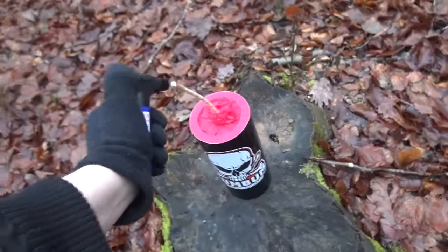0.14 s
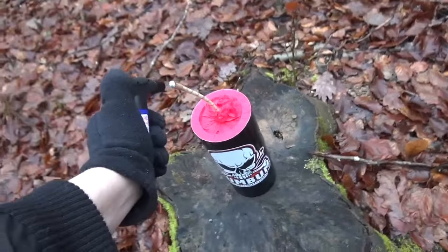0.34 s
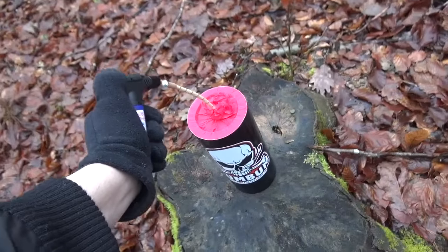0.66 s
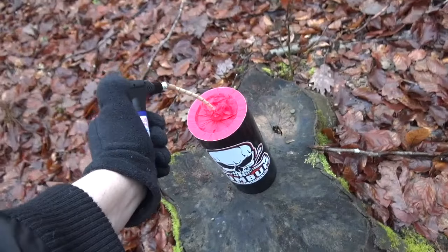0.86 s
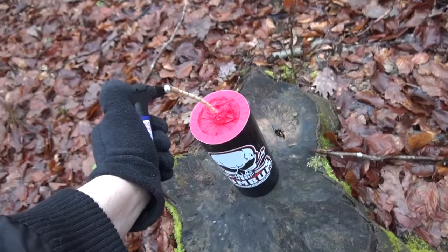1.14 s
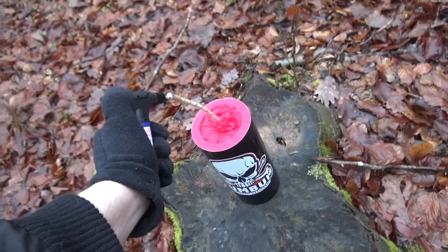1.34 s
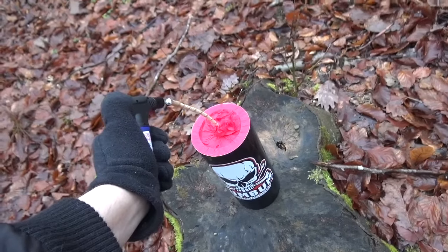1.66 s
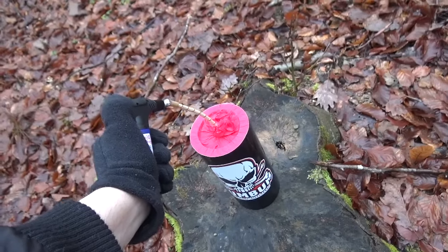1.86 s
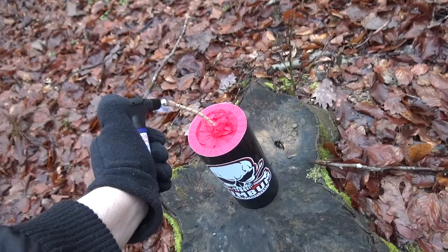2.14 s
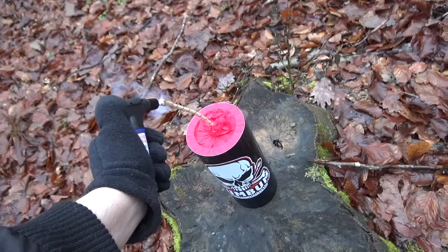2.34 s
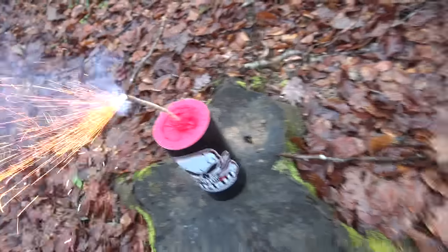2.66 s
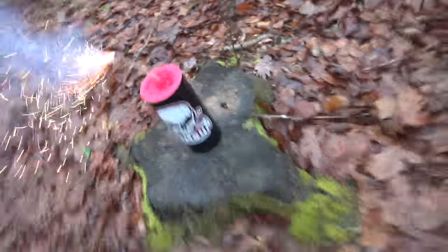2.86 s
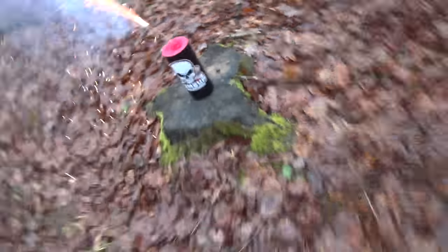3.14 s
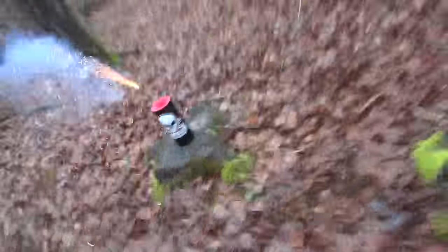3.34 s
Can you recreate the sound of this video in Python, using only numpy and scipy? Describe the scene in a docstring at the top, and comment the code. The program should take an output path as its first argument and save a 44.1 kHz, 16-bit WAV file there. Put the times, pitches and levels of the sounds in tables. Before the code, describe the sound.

Close up in quiet woods, faint glove ticks, a bright lighter snap and a steady gas jet lead to a firework fuse flaring harshly, then roaring lower with pops, while feet thud and leaves rustle.

```python
"""Quiet woods, a stereo microphone held close to a tree stump: faint rumble, hiss and a softly rubbing sleeve.
A glove ticks on a jet lighter, the trigger snaps, and a turbulent flame, made of shaped noise, roars.
The trigger lets go and a firework fuse catches: noise and tiny sparks sizzle and flare, with damped swings as pops.
The flat stump mirrors both flames as a close delayed echo, which hollows their tone.
The person holding the microphone backs away: soft thuds of the feet over rustling grains of fallen leaves."""
import sys
import numpy as np
from scipy import signal
from scipy.fft import rfft, irfft
from scipy.io import wavfile
from scipy.ndimage import uniform_filter1d, map_coordinates

SR = 44100
rng = np.random.default_rng(int(sys.argv[2]) if len(sys.argv) > 2 else 0)


def digitize_waveform(pressure):
    """Quantize a signal to 16-bit integers and store it at the path in sys.argv[1].

    Rows of a 2-D input are taken as channels; values are limited to [-1, 1].
    """
    field = np.atleast_2d(pressure).T
    bounded = np.clip(field, -1, 1)
    quanta = np.round(bounded * 32767).astype(np.int16)
    wavfile.write(sys.argv[1], SR, quanta)


N = 154350  # samples, 3.5 s

# Spectrum of the woods' rumble and hiss. Each row: frequency in Hz, relative density in dB per Hz.
WOODS_SPECTRUM = [(25, -3), (70, 1), (130, -7), (250, -9.5), (450, -12), (620, -5), (900, -18), (1150, -8),
                  (1600, -9), (2300, -15.5), (4500, -22.5), (6000, -14), (7100, -15.5), (8300, -16),
                  (9600, -17.5), (11000, -20.5)]
WOODS_DB, WOODS_WAVER_DB = -42.5, 1.0

# Spectrum of the sleeve and glove rubbing. Each row: frequency in Hz, relative density in dB per Hz.
SLEEVE_SPECTRUM = [(25, -4), (75, -3), (130, -4), (300, -10), (700, -13), (1600, -15), (4000, -31),
                   (11000, -33)]
SLEEVE_DB, HAND_STILL_S = -46.5, 0.2

# Glove ticks on the lighter. Each row: start in seconds, level in dB, pitch in Hz.
GLOVE_TICKS = [(.0228, -38, 6000), (.0735, -33, 4500), (.0785, -36, 4500), (.085, -36, 5000),
               (.153, -32, 5000), (.184, -35, 9000), (.2195, -29, 5600), (.4635, -24, 1700)]
TICK_DECAY_S = 0.0015

# Trigger snaps: igniter, its rebound, release.
# Each row: start in seconds, level of the snap in dB, level of the hand's thump in dB.
TRIGGER_SNAPS = [(.469, 3.5, -21), (0.4705, -22, -48), (2.3752, -22.5, -32)]
THUMP_HZ, THUMP_RISE_S, THUMP_LAG_S = 144, 0.003, 0.00155

# Ringing modes of the lighter body. Each row: frequency in Hz, level in dB, time to fall 60 dB in seconds.
LIGHTER_MODES = [(1720, -14.5, 0.022), (2120, -12, 0.012), (3680, -16, .02), (6390, -6, 0.01),
                 (7010, -15.5, 0.039), (8150, -2, 0.0078), (9520, -9.5, 0.016)]
CRACK_DB, CRACK_DECAY_S = -12, 0.00083
SCATTER_DB, SCATTER_DECAY_S = -14.5, 0.008

# Spectrum of the lighter flame. Each row: frequency in Hz, relative density in dB per Hz.
JET_SPECTRUM = [(100, -36), (250, -18), (400, -12), (560, -3.5), (750, -6), (1050, -0.5), (1400, 0),
                (1900, -3), (2500, -6.5), (3200, -14), (4500, -14), (6000, -29), (7800, -19.5),
                (9300, -41.5), (11000, -33)]
JET_DB, JET_FLUTTER_DB = -34, 0.8
JET_ON_S, JET_RISE_S, JET_OFF_S, JET_FALL_S = 0.452, 0.037, 2.38, 0.037
GAS_DB, GAS_DECAY_S = -44, 0.59  # extra gas hiss while the flame settles
DIP_S, DIP_WIDTH_S, DIP_DB = 0.693, 0.0061, -16

# Echo off the stump. Each row: time in seconds, delay in milliseconds, gain as a ratio to the direct sound.
STUMP_ECHO = [(.5, 2.28, 0.3), (1.1, 2.11, 0.25), (2.4, 2.14, 0.35), (2.63, 2.14, 0.26), (2.8, 2.08, 0.2),
              (3.05, 1.64, 0.085), (3.5, 1.64, 0.033)]

# Course of the burning fuse, before the overall trims below.
# Each row: time in seconds, level of the roar in dB, level of the sizzle in dB.
FUSE_COURSE = [(2.385, -35, -35.5), (2.443, -27, -19), (2.497, -19.5, -13.5), (2.551, -20, -9),
               (2.593, -14.5, -12.5), (2.667, -12.5, -6.5), (2.689, -9, -11), (2.803, -11, -18),
               (2.867, -17, -26), (2.873, -16, -25.5), (3.009, -17.5, -27.5), (3.039, -15.5, -25.5),
               (3.115, -20.5, -24), (3.137, -20.5, -29.5), (3.381, -20.5, -27.5), (3.395, -19, -25.5),
               (3.451, -21.5, -29.5), (3.49, -18.5, -23)]
ROAR_TRIM_DB, SIZZLE_TRIM_DB, FUSE_RISE_S = -1, -0.5, 0.033
SPUTTER_DB, SPARK_DB, SPARKS_PER_S = 1.14, -11.5, 1700

# Spectrum of the fuse's roar. Each row: frequency in Hz, relative density in dB per Hz.
ROAR_SPECTRUM = [(60, -20), (250, -7.5), (520, -5), (750, -4.5), (1100, 1.5), (1500, 2.5), (2400, -1.5),
                 (3500, -4.5), (5500, -9), (11000, -32)]
# Spectrum of the fuse's sizzle. Each row: frequency in Hz, relative density in dB per Hz.
SIZZLE_SPECTRUM = [(1000, -43), (2500, -6), (3700, -2.5), (5200, -0.5), (7300, 3.5), (9000, 0.5),
                   (11000, -3.5)]
ROAR_BAND, SIZZLE_BAND = (900, 3000), (6000, 11000)  # Hz, where each level is set

# Pops of the burning fuse. Each row: time in seconds, level in dB, pitch in Hz.
FUSE_POPS = [(2.871, -7, 1560), (2.899, -6.5, 1600), (2.915, -5, 1500), (3.0334, -8.5, 1660),
             (3.13, -19, 1720), (3.167, -8, 1890), (3.226, -10, 1010), (3.292, -14, 2430),
             (3.398, -6.5, 1700)]
POP_RISE_S, POP_CRACK_DB = 0.00119, -5.5

# Direction of the fuse as the microphone turns away. Each row: time in seconds, left minus right in dB.
FUSE_DIRECTION = [(2.4, -1.1), (2.68, 0.5), (2.8, 2), (3.0, 2.5), (3.12, 0), (3.5, 0.5)]

# Spectrum of the leaves and clothing. Each row: frequency in Hz, relative density in dB per Hz.
RUSTLE_SPECTRUM = [(25, 0.5), (90, 0.5), (200, -6), (500, -1), (900, 0.5), (1800, -19), (4000, -22),
                   (11000, -17)]
RUSTLE_DB, RUSTLE_WAVER_DB, LEAF_GRAINS_PER_S = -25, 1.0, 1200
MOVE_S, MOVE_RISE_S = 2.615, 0.41

# Footfalls and jolts. Each row: start in seconds, level in dB, pitch in Hz.
FOOTFALLS = [(3.134, -34, 96), (3.218, -13.5, 90), (3.298, -20.5, 105), (3.335, -24, 108), (3.412, -22, 64)]
STEP_RISE_S = 0.0083

# Diffuse share in the two channels. Each row: frequency in Hz, share in dB.
DIFFUSE_SHARE = [(50, -25), (200, -12), (1300, -19.5), (4000, -15), (7500, -11), (11000, -11.5)]
# Unlike microphone ports. Each row: frequency in Hz, left minus right in dB.
MIC_PORT_BALANCE = [(100, 1.5), (500, -1.5), (1200, 0), (2500, 1.9), (4500, 2), (8000, -1.5), (11000, 1)]
BAND_HZ, TOP_HZ = 11030, 15800  # cutoffs before and after the overload


def undb(db):
    """Decibels to gain."""
    return 10 ** (np.asarray(db) / 20)


def clock():
    """Time of every sample, in seconds."""
    return np.arange(N) / SR


def frequencies():
    """Frequency of every spectral bin, in Hz."""
    return np.arange(N // 2 + 1) * SR / N


def curve(table, axis):
    """One column of a table, joined by straight lines in time."""
    rows = np.array(table)
    return np.interp(clock(), rows[:, 0], rows[:, axis])


def unit(x):
    """Scale to rms 1."""
    return x / np.sqrt(np.mean(x ** 2))


def gains(points):
    """Gain at every frequency, joining (Hz, dB) points along a log frequency axis."""
    hz, db = np.array(points).T
    return undb(np.interp(np.log(frequencies() + 1), np.log(hz), db))


def shaped(x, points, band=(20, BAND_HZ)):
    """Colour a white signal so that the given band alone carries its original rms."""
    gain, hz = gains(points), frequencies()
    in_band = (hz > band[0]) * (hz < band[1])
    band_rms = np.sqrt(np.mean(gain ** 2 * in_band))
    return irfft(rfft(x) * gain / band_rms, N)


def noise():
    """White noise of rms 1."""
    return rng.standard_normal(N)


def spread(mid, side):
    """Two channels: a direct part in both, and a filtered diffuse part of opposite sign."""
    diffuse = irfft(rfft(side) * gains(DIFFUSE_SHARE), N)
    return mid + diffuse * np.array([[1], [-1]])


def walk(rate):
    """Smooth random wander of rms 1: noise averaged twice over 1/rate seconds."""
    width = max(int(SR / rate), 2)
    return unit(uniform_filter1d(uniform_filter1d(noise(), width), width))


def grains(rate, scatter_db):
    """Sparse clicks, rate per second, of very unequal size and random sign."""
    size = undb(scatter_db * np.minimum(rng.exponential(size=N), 4))
    struck = rng.random(N) < rate / SR
    return unit(struck * size * np.sign(noise()))


def resonate(x, hz, width_hz):
    """One resonance."""
    b, a = signal.iirpeak(min(hz, SR / 2 - 1), hz / width_hz, SR)
    return signal.lfilter(b, a, x)


def fade(start, decay):
    """Sudden start and exponential decay."""
    age = clock() - start
    return (age >= 0) * np.exp(-np.clip(age / decay, 0, 50))


def thud(start, hz, rise):
    """A heavily damped swing whose envelope starts softly and peaks after the rise time."""
    age = np.maximum(clock() - start, 0)
    return age / rise * np.exp(1 - age / rise) * np.sin(2 * np.pi * hz * age)


def woods(diffuse_db=5):
    """Faint outdoor rumble and hiss: wide, slowly wavering noise from all around."""
    level = undb(WOODS_DB + WOODS_WAVER_DB * walk(5))
    return level * shaped(spread(noise(), undb(diffuse_db) * noise()), WOODS_SPECTRUM)


def sleeve():
    """Sleeve and glove rub softly, as dull noise, until the hand reaches the fuse."""
    reaching = np.clip((HAND_STILL_S - clock()) / 0.03 + 1, 0, 1)  # fades over the next 30 ms
    return undb(SLEEVE_DB) * reaching * shaped(spread(noise(), noise()), SLEEVE_SPECTRUM)


def trigger():
    """Glove ticks are short resonant bursts; trigger snaps crack, ring the body's modes and jolt the hand."""
    t, out = clock(), 0
    for start, db, hz in GLOVE_TICKS:
        tick = unit(resonate(spread(noise(), noise()), hz, hz * 1.3))
        out = out + undb(db) * fade(start, TICK_DECAY_S) * tick
    for start, db, thump_db in TRIGGER_SNAPS:
        ring = 0
        for hz, mode_db, t60 in LIGHTER_MODES:
            swing = np.sin(2 * np.pi * hz * (t - start))
            ring = ring + undb(mode_db) * fade(start, t60 / np.log(1000)) * swing
        burst = undb(CRACK_DB) * fade(start, CRACK_DECAY_S)
        scatter = undb(SCATTER_DB) * fade(start, SCATTER_DECAY_S)
        crack = (burst + scatter) * shaped(spread(noise(), noise()), SIZZLE_SPECTRUM)
        thump = undb(thump_db) * thud(start + THUMP_LAG_S, THUMP_HZ, THUMP_RISE_S)
        out = out + undb(db) * (ring + crack) + thump
    return out


def jet():
    """The lighter's turbulent flame: fluttering noise builds, holds and stops; its level dips briefly once."""
    t = clock()
    rise = 1 - np.exp(-np.maximum(t - JET_ON_S, 0) / JET_RISE_S)
    fall = np.clip((JET_OFF_S - t) / JET_FALL_S + 1, 0, 1)
    level = undb(JET_DB + JET_FLUTTER_DB * walk(19))
    flame = level * rise * fall * shaped(spread(noise(), noise()), JET_SPECTRUM)
    gas_level = undb(GAS_DB) * fade(JET_ON_S, GAS_DECAY_S)
    gas = gas_level * shaped(spread(noise(), noise()), SIZZLE_SPECTRUM)
    dip = undb(DIP_DB * np.exp(-((t - DIP_S) / DIP_WIDTH_S) ** 2))
    return (flame + gas) * dip


def stump(x):
    """The flat stump returns a close echo, which fades as the microphone retreats."""
    place = np.arange(N) - curve(STUMP_ECHO, axis=1) * SR / 1000  # delayed position in samples
    gain = curve(STUMP_ECHO, axis=2)
    echo = np.array([map_coordinates(channel, [place], order=3) for channel in x])
    return (x + gain * echo) / np.hypot(1, gain)


def burning_gas():
    """White noise of streaming gas, full of tiny spark clicks."""
    sparks = undb(SPARK_DB) * grains(SPARKS_PER_S, scatter_db=3)
    return spread(noise() + sparks, undb(-0.5) * noise())


def fuse_pops():
    """Each pop is a heavily damped swing with a crack of noise."""
    crack = undb(POP_CRACK_DB) * shaped(noise(), ROAR_SPECTRUM)
    out = 0
    for peak, db, hz in FUSE_POPS:
        swing = thud(peak - POP_RISE_S, hz, POP_RISE_S)
        out = out + undb(db) * (swing + crack * fade(peak, 2 * POP_RISE_S))
    return out


def fuse():
    """Burning powder: a sputtering roar of gas, a sizzle full of tiny sparks, and a few pops."""
    lit = np.clip((clock() - FUSE_COURSE[0][0]) / FUSE_RISE_S + 1, 0, 1)  # full at the first row
    sputter = SPUTTER_DB * walk(91)
    roar_level = undb(ROAR_TRIM_DB + curve(FUSE_COURSE, axis=1) + sputter)
    roar = roar_level * shaped(burning_gas(), ROAR_SPECTRUM, ROAR_BAND)
    sizzle_level = undb(SIZZLE_TRIM_DB + curve(FUSE_COURSE, axis=2) + 0.64 * sputter)
    sizzle = sizzle_level * shaped(burning_gas(), SIZZLE_SPECTRUM, SIZZLE_BAND)
    pan = undb(curve(FUSE_DIRECTION, axis=1) * np.array([[0.5], [-0.5]]))
    return (lit * (roar + sizzle) + fuse_pops()) * pan


def retreat():
    """Feet thud on soft ground as damped swings; leaves and clothing rustle as noise and grains."""
    moving = np.clip((clock() - MOVE_S) / MOVE_RISE_S, 0, 1)
    leaves = undb(-4) * grains(LEAF_GRAINS_PER_S, scatter_db=7)
    crunch = spread(noise() + leaves, undb(4.5) * noise())
    level = undb(RUSTLE_DB + RUSTLE_WAVER_DB * walk(40))
    rustle = level * moving * shaped(crunch, RUSTLE_SPECTRUM)
    feet = sum(undb(db) * thud(start, hz, STEP_RISE_S) for start, db, hz in FOOTFALLS)
    return rustle + feet


def scene():
    """The woods and the handling, both flames over the stump, and the steps."""
    return woods() + sleeve() + trigger() + stump(jet() + fuse()) + retreat()


def record(dry):
    """Two slightly unlike microphone ports, a narrow band, and overload on the loudest peaks."""
    tilt = np.sqrt(gains(MIC_PORT_BALANCE))  # half the difference to each port
    heard = irfft(rfft(dry) * np.array([tilt, 1 / tilt]), N)
    band_filter = signal.ellip(14, 0.1, 85, BAND_HZ, fs=SR, output="sos")
    overloaded = np.clip(signal.sosfilt(band_filter, heard), -1, 1)
    top_filter = signal.ellip(8, 0.1, 50, TOP_HZ, fs=SR, output="sos")  # trims the overload's harmonics
    return signal.sosfilt(top_filter, overloaded)


dry = scene()
out = record(dry)
digitize_waveform(out)
```